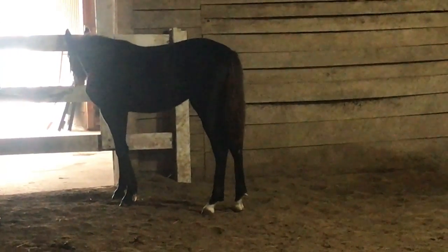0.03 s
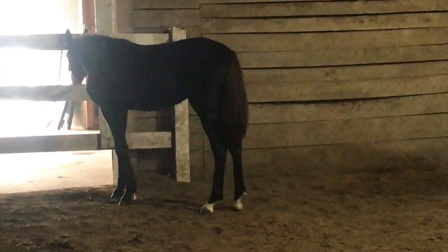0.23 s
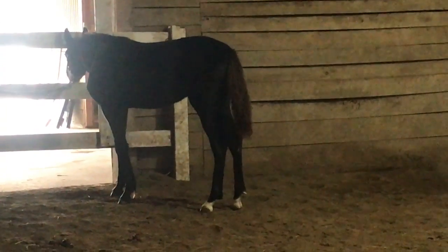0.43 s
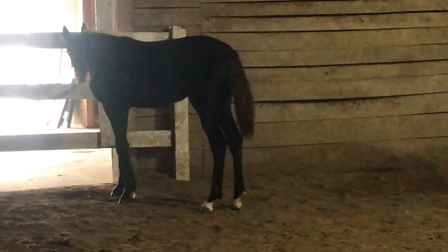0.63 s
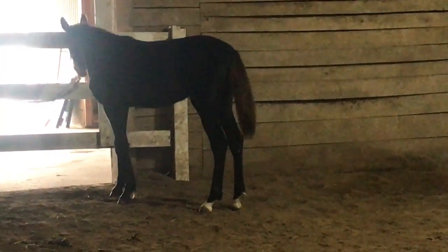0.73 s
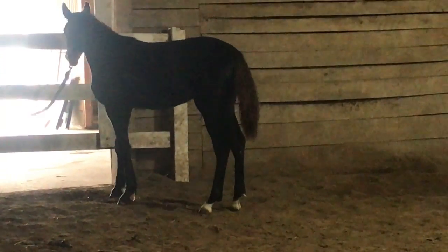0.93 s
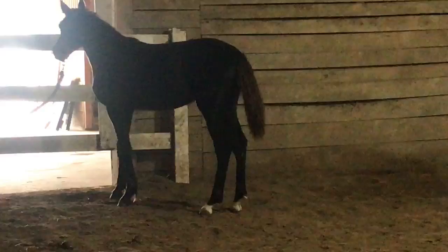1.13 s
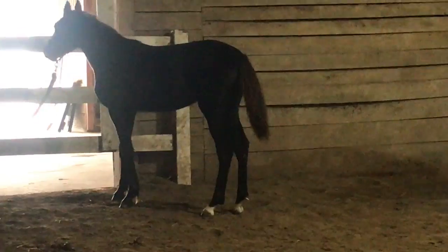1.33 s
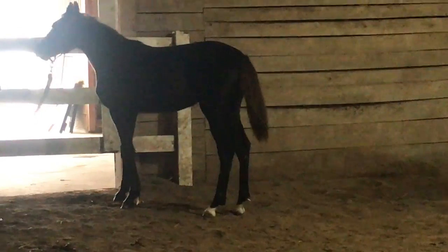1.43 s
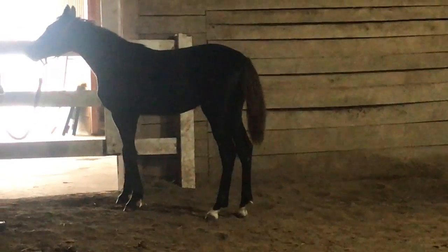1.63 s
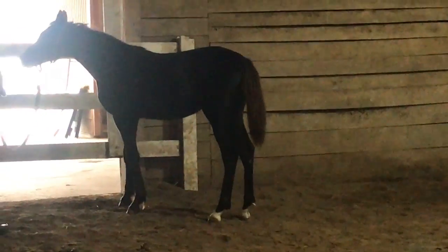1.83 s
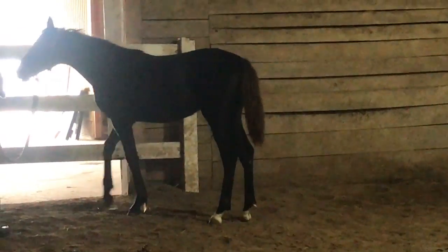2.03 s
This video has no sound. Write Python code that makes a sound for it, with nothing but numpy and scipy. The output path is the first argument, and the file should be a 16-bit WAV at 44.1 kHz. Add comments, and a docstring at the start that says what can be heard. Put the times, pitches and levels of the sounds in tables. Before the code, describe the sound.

A young horse whinnies in a quiet, slightly echoing wooden barn. The call opens with a high squeal at about 0.2 seconds, then wavers in rapid, breathy pulses. From around 1 second it sinks and grows hoarse, ending in low fluttering grunts between 1.6 and 2 seconds. Hooves scrape the dirt softly at the start and near 0.9 seconds, over a faint low rumble.

```python
"""In a wooden barn, a young horse whinnies. Its vocal folds oscillate at a high pitch that arches seven
times a second, sinking and growing hoarser; in the troughs, period doubling adds half and quarter pitch.
A puff of turbulent air follows each crest, some with a croak or a thin squeak, and low fluttering grunts
end the call. Hooves scrape the dirt floor, the boards reflect it all, and a faint rumble lies beneath."""
import sys
import numpy as np
from scipy import signal
from scipy.fft import rfft, irfft
from scipy.io import wavfile

SR = 44100
rng = np.random.default_rng(int(sys.argv[2]) if len(sys.argv) > 2 else 0)


def transcribe(u):
    """Save the signal u as a 16-bit wav file named by the first command-line argument.

    u: samples, shape (n,) or (channels, n), limited to [-1, 1]; the rate is SR.
    q: integer samples, one column per channel.
    """
    v = np.clip(np.atleast_2d(u).T, -1, 1)
    q = np.round(v * 32767).astype(np.int16)
    wavfile.write(sys.argv[1], SR, q)


N = 92610
TOP_HZ = 15550  # upper band limit

# crests of the voice: t/s, f/Hz, level/dB, puff level/dB, roughness, upper overtone gain/dB
ARCHES = [(.29, 1505, -29, -57.5, 0.06, -1.5), (.432, 1458, -24, -51.5, 0.1, -4),
          (.568, 1462, -23, -49, 0.09, -4), (.702, 1496, -25.5, -47.5, 0.17, 3),
          (.85, 1506, -23, -48, 0.06, 0.5), (.983, 1496, -25, -46, 0.05, 2.5),
          (1.124, 1458, -24, -48.5, 0.02, 6), (1.259, 1411, -30.5, -46, 0.08, 10.5),
          (1.392, 1356, -26.5, -46.5, 0.12, 8), (1.539, 1322, -24.5, -45, 0.17, -1.5),
          (1.637, 1307, -31.5, -56.5, .8, 1.5), (1.709, 1309, -33.5, -53.5, 1.23, -9)]


def undb(db):
    """The decibel is logarithmic: 20 dB is a tenfold amplitude."""
    return 10 ** (np.asarray(db) / 20)


def unit(x):
    """Normalisation to rms 1."""
    return x / np.sqrt(np.mean(x ** 2))


def at(points, hz):
    """Interpolation of (f/Hz, value) points on a log-frequency axis."""
    f, v = np.array(points, float).T
    return np.interp(np.log(hz + 1), np.log(f), v)


def colour(x, points):
    """Minimum-phase filter: folding the cepstrum makes the (f/Hz, gain/dB) response causal."""
    size = 2 * N
    cepstrum = irfft(np.log(undb(at(points, np.arange(N + 1) * SR / size))))
    cepstrum[1:N] *= 2
    cepstrum[N + 1:] = 0
    return irfft(rfft(x, size) * np.exp(rfft(cepstrum)))[:N]


def noise(points):
    """Spectral shaping of white noise, at rms 1."""
    return unit(colour(rng.standard_normal(N), points))


def wobble(hz):
    """Random modulation: noise low-passed near hz, at rms 1."""
    f = np.arange(N // 2 + 1) * SR / N
    spectrum = rfft(rng.standard_normal(N)) / np.sqrt(1 + (f / hz) ** 2)
    return unit(irfft(spectrum * np.exp(-(f / hz / 2) ** 2), N))


def burst(t, start, length, edge):
    """Trapezoidal envelope: attack, hold and release."""
    return np.clip((t - start) / edge, 0, 1) * np.clip((start + length - t) / edge + 1, 0, 1)


def rumble():
    """Ambient noise: a faint low rumble whose level wavers slightly."""
    spectrum = [(20, -25.5), (45, -1), (80, 0.5), (140, -5), (300, -9.5), (600, -15), (1200, -19),
                (2200, -29.5), (5000, -36.5), (15000, -44.5)]  # quiet barn: f/Hz, relative level/dB
    return undb(-55 + wobble(16)) * noise(spectrum)


def barn(t, x):
    """Reverberation: direct sound, early reflections and an exponential tail whose treble dies first."""
    decay_times = [(100, 0.54), (400, 0.95), (1250, 0.82), (1520, 0.96), (2500, 0.73), (4500, 0.69),
                   (8000, 0.46), (15000, 0.1)]  # reverberation time: f/Hz, T60/s
    echoes = [(.0043, 0.18), (0.017, 0.13), (.066, 0.25)]  # reflections off floor and boards: delay/s, gain
    onset_s = 0.018
    f, lag, cells = signal.stft(rng.standard_normal(N), SR, nperseg=256)
    fade = np.exp(-np.log(1000) * lag / at(decay_times, f)[:, None]) * np.minimum(lag / onset_s, 1)
    tail = signal.istft(cells * fade, SR)[1][:N] * np.sqrt(16 / SR)
    early = x + sum(gain * np.interp(t - delay, t, x, left=0) for delay, gain in echoes)
    return undb(-6) * early + undb(-3.5) * signal.fftconvolve(x, tail)[:N]


def hooves(t):
    """Friction noise: hooves shuffle on the dirt in soft gritty scrapes."""
    shuffles = [(0.061, 0.067, -47), (0.926, 0.065, -47), (2.027, 0.065, -57)]  # scrapes: t/s, duration/s, level/dB
    dirt = [(30, -26), (80, 8), (150, -10.5), (350, -10), (700, -19.5), (1100, -13.5), (2000, -24),
            (5000, -36.5), (15000, -61)]  # scrape spectrum: f/Hz, relative level/dB
    weight = sum(undb(db) * burst(t, start, length, edge=0.042) for start, length, db in shuffles)
    return weight * noise(dirt) * undb(2.9 * wobble(88))


def flutter(effort, resonances, hz, air):
    """Source and filter: uneven flaps of soft tissue, each with a gasp of air, excite resonances."""
    cycles = np.cumsum(hz * (1 + 0.2 * wobble(hz / 2))) / SR
    flaps = unit(np.diff(np.floor(cycles), prepend=0))
    gasps = unit(np.exp(-(cycles % 1) / 0.37) * rng.standard_normal(N))
    drive = flaps + air * gasps
    return colour(drive * effort, resonances) / np.std(colour(drive, resonances))


def grunts(t):
    """Cavity resonance: slow flaps ring the chest and nose."""
    pushes = [(1.627, 0.026, -28), (1.674, 0.05, -30.5), (1.807, 0.019, -40.5), (1.948, 0.07, -47.5)]  # closing grunts: t/s, duration/s, level/dB
    chest = [(40, -28), (70, -5), (97, 0), (140, -13.5), (215, 6), (255, -5.5), (292, 0), (380, -15),
             (800, -16), (2000, -32.5), (8000, -51)]  # chest and nose response: f/Hz, relative gain/dB
    effort = sum(undb(db) * burst(t, start, length, edge=0.0042) for start, length, db in pushes)
    return flutter(effort, chest, hz=85.6, air=0.64)


def croaks(t):
    """Pulse excitation: where the voice cracks, uneven pulses rattle the throat."""
    cracks = [(0.746, -36.5), (.878, -48), (1.022, -40.5), (1.163, -35), (1.293, -42), (1.425, -38)]  # cracks after the crests: t/s, level/dB
    throat = [(140, -22.5), (210, 2), (260, -4), (380, -1), (640, -17.5), (830, -1.5), (1120, -4.5),
              (1350, 6), (1700, -8.5), (2500, -10), (3600, -38), (8000, -40.5)]  # throat response: f/Hz, relative gain/dB
    effort = sum(undb(db) * burst(t, start, length=0.04638, edge=0.0028) for start, db in cracks)
    return flutter(effort, throat, hz=206.14, air=0.5)


def squeaks(t):
    """Frequency glide: brief harmonic squeals slide down as the voice breaks."""
    squeals = [(1.15, -53), (1.289, -45.5), (1.421, -43.5), (1.56, -43)]  # ends of the late arches: t/s, level/dB
    partials = [-8, 6.5, -2.5, -19, -29, -8.5]  # harmonics 1 to 6: gain/dB
    middle_hz, sag_hz_per_s, width_s, jitter = 1150, 7000, 0.011, 0.012
    out = 0
    for middle, db in squeals:
        late = np.clip(t - middle, -0.05, 0.05)
        hz = (middle_hz - sag_hz_per_s * late) * (1 + jitter * wobble(404.5))
        phase = 2 * np.pi * np.cumsum(hz) / SR
        tone = sum(undb(partial_db) * np.sin(k * phase) for k, partial_db in enumerate(partials, 1))
        out = out + undb(db) * np.exp(-((t - middle) / width_s) ** 2) * tone
    return out


def puffs(t):
    """Turbulence noise: air rushes out just after each crest and flows more gently in between."""
    spectrum = [(300, -12), (800, -4), (1400, 4), (2000, 0), (2500, 4), (3700, -9), (4500, -2), (5500, -3),
                (6400, -12), (7200, -7), (8300, -17), (10500, -20), (12200, -16.5), (15500, -23)]  # outrushing air: f/Hz, relative level/dB
    lag_s, rush_s, gentle_s = 0.019, 0.028, 0.075
    flow = 0
    for crest_s, _, _, db, *_ in ARCHES:
        late = t - crest_s - lag_s
        flow = flow + undb(db) * (np.exp(-(late / rush_s) ** 2) + 0.25 * np.exp(-(late / gentle_s) ** 2))
    return flow * noise(spectrum) * undb(2 * wobble(150))


def harmonics(phase, hz, octave_db, bright_db):
    """Formant filtering: throat and mouth weight each harmonic of the clear voice."""
    throat = [(200, -10), (600, 6), (830, 2), (1060, -2.5), (1200, -10), (1320, 0.5), (1480, 3.5),
              (1750, 3.5), (2100, -14), (2500, -11), (2800, -15), (2950, -15), (3150, -20), (3700, -44.5),
              (4050, -28), (4450, -18), (4900, -30), (5400, -21.5), (5950, -31.5), (6350, -38.5),
              (7300, -31.5)]  # throat and mouth response: f/Hz, gain/dB
    treble = [(7550, -32), (8100, -46), (10000, -42), (11000, -46), (15000, -47)]  # the same for the highest partials: f/Hz, gain/dB
    out = 0
    for k in range(1, 15):
        db = at(throat + treble, k * hz) + (k == 2) * octave_db + bright_db * min((k - 1) / 3.87, 1)
        out = out + undb(db) * (k * hz < TOP_HZ) * np.sin(k * phase)
    return out


def subharmonics(phase, hz, highest):
    """Period doubling: odd multiples of a halved pitch fall between the partials of the pitch above."""
    throat = [(155, -22), (205, -6.5), (262, -10.5), (330, 1.5), (410, -5), (540, -9), (660, -35.5),
              (1000, -1), (1400, -6.5), (1630, -15.5), (2600, -28.5), (3600, -33), (5300, -43)]  # throat and mouth response to the broken voice: f/Hz, gain/dB
    return sum(undb(at(throat, k * hz)) * np.sin(k * phase) for k in range(1, highest + 1, 2))


def whinny(t):
    """Nonlinear oscillation: the voice arches up to each crest; in the troughs its period doubles twice."""
    squeal = [(0.16, 1510, -63), (0.173, 1461, -35), (0.194, 1420, -41), (0.213, 1285, -31.5),
              (0.237, 1317, -39)]  # opening squeal: t/s, f/Hz, level/dB
    # dips between crests: t/s, f/Hz, level/dB, half-pitch gain/dB, quarter-pitch gain/dB, roughness
    troughs = [(0.354, 1051, -30.5, -3, -31, 0.3), (.49, 1084, -29, 5.5, -28, 0.21),
               (0.629, 1045, -31, -1.5, -32, 0.59), (0.78, 965, -44, 5, -13.5, 1.04),
               (.91, 908.7, -38, 1, -7.5, 0.93), (1.049, 832, -39, -1, -22, 0.93),
               (1.189, 818.4, -34.5, -7.5, -14, .9), (1.325, 820.8, -37, -0.5, 1, 1),
               (1.46, 828.1, -36.5, -1.5, 0, 1.06), (1.59, 839, -40, 5, 8.5, 1.11),
               (1.67, 893, -45, -22, 1, 1.08)]
    breath = [(300, 24.5), (800, 19), (1400, 27), (2000, 24.5), (2600, -1.5), (3700, -25), (4500, 2.5),
              (6400, -6), (7200, 2), (8300, -13.5), (15500, -21)]  # air in throat and mouth: f/Hz, relative level/dB
    rise_s, fall_s, end_s, release_s = 0.06, 0.043, 1.722, 0.02
    tiring_s, break_fade_db_per_s = (1, 1.6), 61
    crest_s, crest_hz, crest_db, _, crest_rough, crest_bright_db = np.array(ARCHES).T
    low_s, low_hz, low_db, half_db, quarter_db, low_rough = np.array(troughs).T
    open_s, open_hz, open_db = np.array(squeal).T

    # as the horse tires, the arches sharpen (2 = parabola) and the voice thins more while it slides
    flatness = np.interp(crest_s, tiring_s, (2.9, 1.9))
    slide_dip_db = np.interp(crest_s, tiring_s, (-2, -4.5))
    since = t - crest_s[:, None]
    distance = np.abs(since) / np.where(since < 0, rise_s, fall_s)
    arch = np.clip(1 - distance ** flatness[:, None], 0, 1).max(axis=0)  # 0 in a trough, 1 on a crest
    nearest = np.abs(since).argmin(axis=0)
    trough = np.clip(np.searchsorted(crest_s, t) - 1, 0, len(low_s) - 1)
    opening = t < crest_s[0]
    tip = arch ** np.where(t < crest_s[nearest], 2.1, 3)  # narrower than the arch, most of all falling

    def blend(share, in_opening, in_trough, on_crests):
        """Linear crossfade from the opening or trough value to that of the nearest crest."""
        return (1 - share) * np.where(opening, in_opening, in_trough) + share * on_crests[nearest]

    hz = blend(arch, np.interp(t, open_s, open_hz), low_hz[trough], crest_hz)
    rough = blend(tip, 0.19, np.interp(t, low_s, low_rough), crest_rough)
    bright_db = blend(tip, -13, -9.5, crest_bright_db)
    octave_db = np.where(opening, 8 * (1 - arch), -1.5 * (1 - arch ** 2))
    level_db = blend(arch, np.interp(t, open_s, open_db), np.interp(t, low_s, low_db), crest_db)
    level_db += slide_dip_db[nearest] * np.sin(np.pi * arch) * ~opening
    gate = (t > open_s[0]) * np.clip(1 - (t - end_s) / release_s, 0, 1)

    jitter = 0.03467 * rough * wobble(387)
    wander = 0.05956 * rough ** 2 * (1 - arch) * wobble(106.7)
    phase = 2 * np.pi * np.cumsum(hz * (1 + jitter + wander)) / SR
    slip_hz = 40 * rough * wobble(91.43)  # the quarter pitch drifts out of step
    quarter_phase = phase / 4 + 2 * np.pi * np.cumsum(slip_hz) / SR

    clear = harmonics(phase, hz, octave_db, bright_db)
    halves = undb(half_db[trough]) * subharmonics(phase / 2, hz / 2, highest=13)
    quarters = undb(quarter_db[trough]) * subharmonics(quarter_phase, hz / 4, highest=25)
    break_fade = undb(-break_fade_db_per_s * (t - low_s[trough]))
    broken = (1 - arch) * ~opening * break_fade * (halves + quarters)
    rasp = undb(-12.5) * rough * noise(breath) * (1 + 0.29 * np.sin(quarter_phase))
    shimmer = 1 + 0.22 * rough * wobble(290)
    return undb(level_db) * gate * ((clear + broken) * shimmer + rasp)


def scene():
    """Superposition: the horse's sounds add and reverberate in the barn, over the rumble."""
    t = np.arange(N) / SR
    horse = whinny(t) + puffs(t) + croaks(t) + squeaks(t) + grunts(t) + hooves(t)
    return (barn(t, horse) + rumble())[None]


def record(dry):
    """Band limiting: filters cut the deepest bass and the highest treble."""
    dry = signal.sosfilt(signal.butter(3, 42, "high", fs=SR, output="sos"), dry)
    return signal.sosfilt(signal.ellip(10, 0.2, 80, TOP_HZ, fs=SR, output="sos"), dry)


dry = scene()
out = record(dry)
transcribe(out)
```